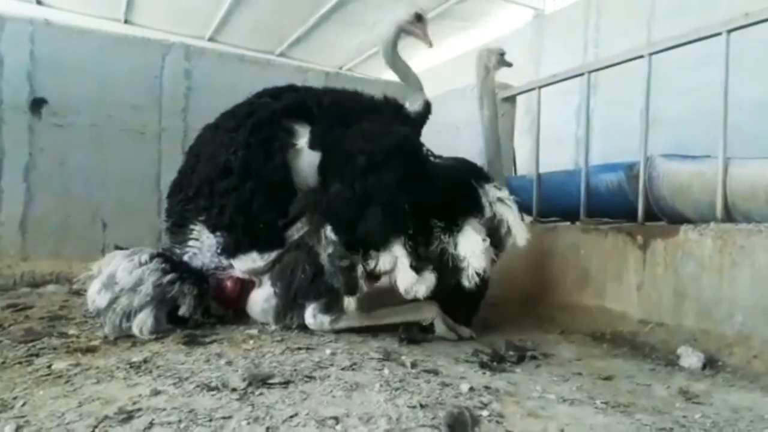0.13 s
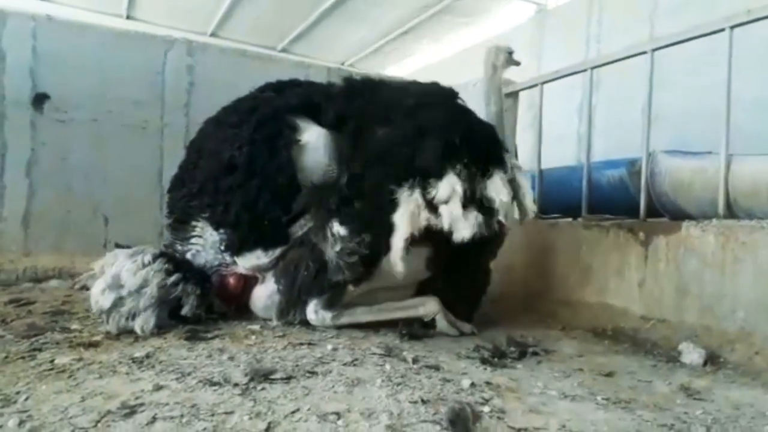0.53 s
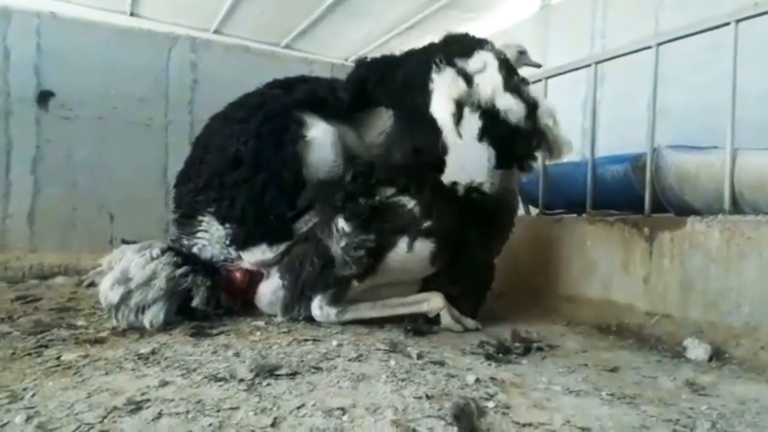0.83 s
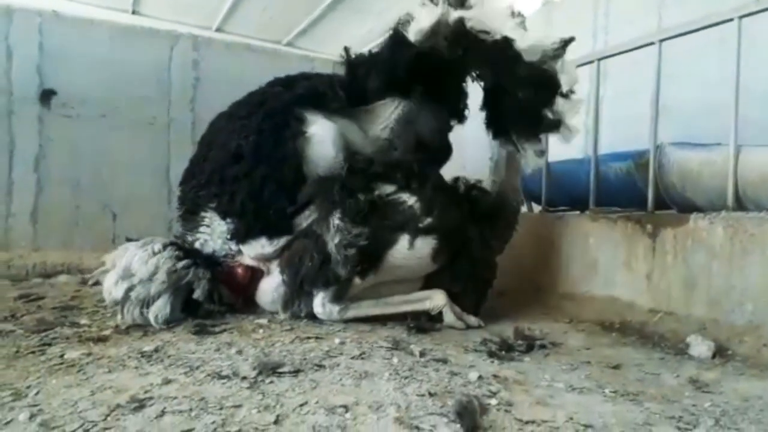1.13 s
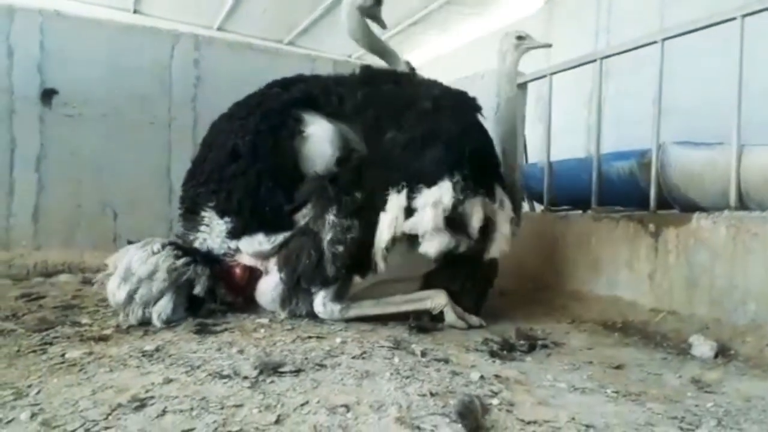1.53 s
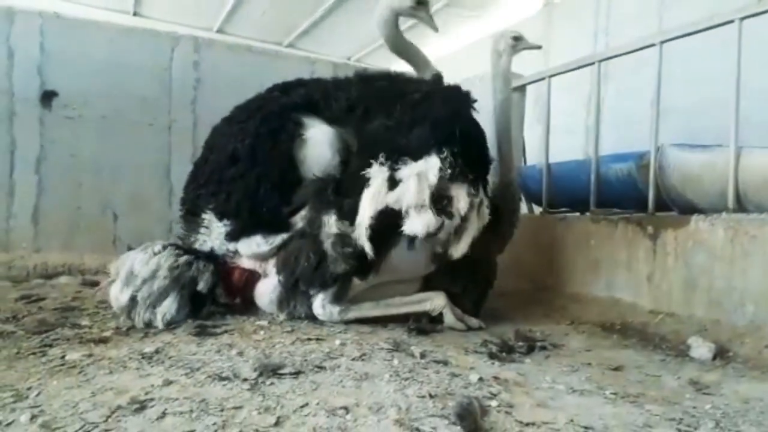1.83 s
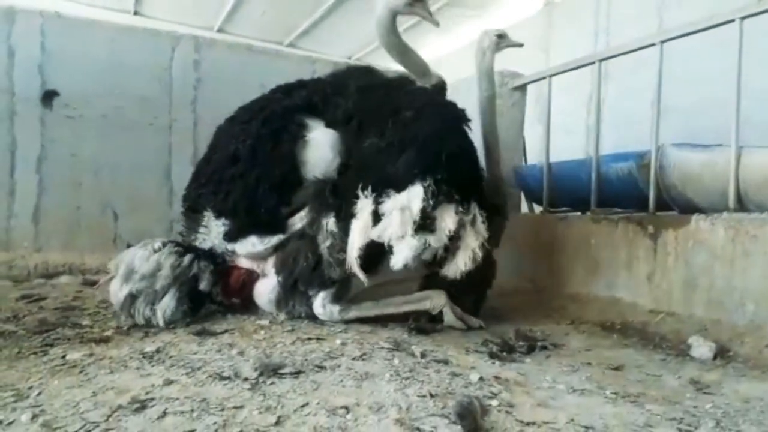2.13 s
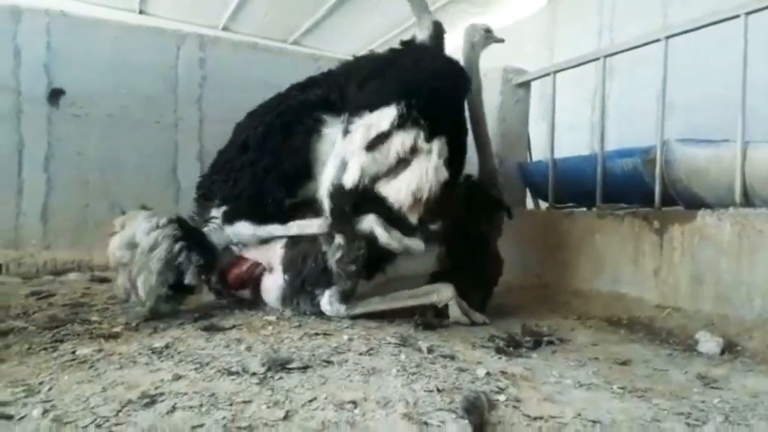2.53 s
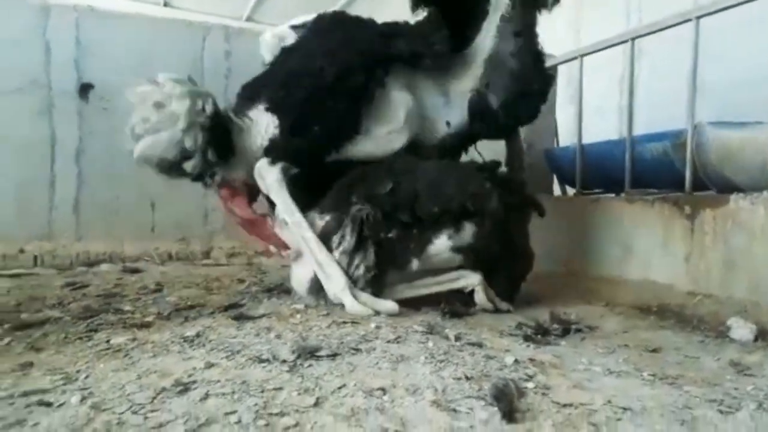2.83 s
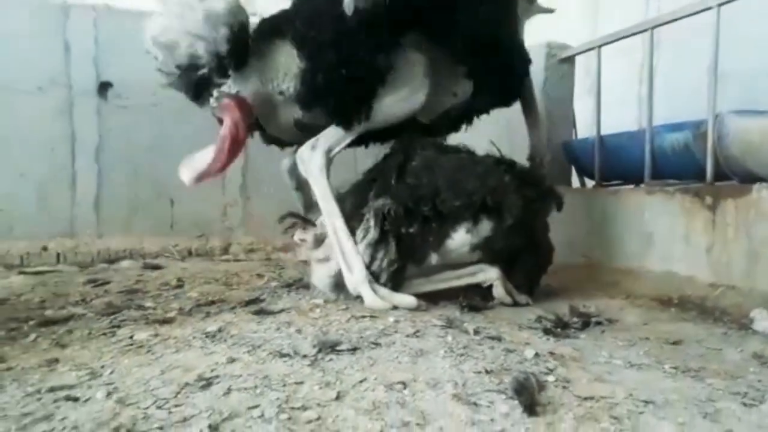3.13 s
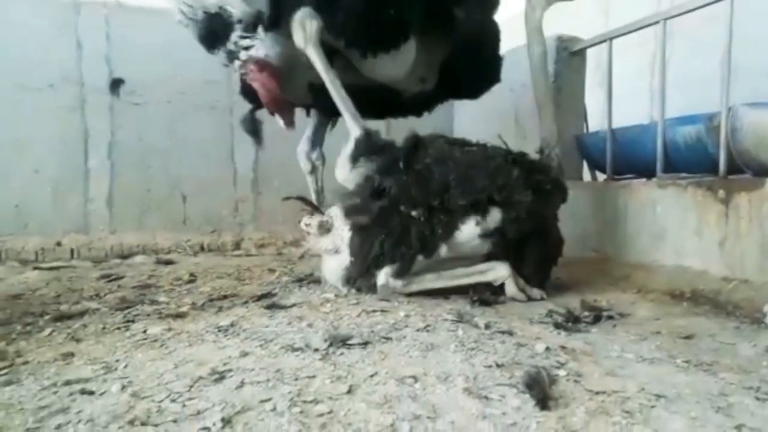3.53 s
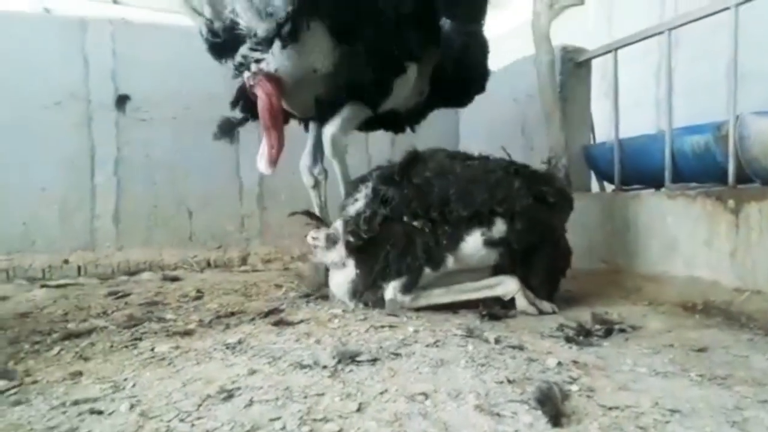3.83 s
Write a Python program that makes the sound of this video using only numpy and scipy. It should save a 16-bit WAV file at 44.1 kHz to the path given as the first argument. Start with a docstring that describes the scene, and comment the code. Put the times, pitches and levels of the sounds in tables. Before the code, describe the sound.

A male ostrich gives one short, low, breathy boom that sinks in pitch, then wings thud softly; after quiet rustling it gets up, feet scuffing dirt and claws knocking stones. Covered concrete pen, short echo, nearly mono.

```python
"""A male ostrich groans out one low boom in a covered concrete pen: partials of a falling pitch, shaped by
neck sac and throat resonances, with noise hissing through the throat. Grains of feather rustle, a quiet
background and faint chirps (narrow noise) run from early on. Its wings then beat softly as sagging low
cycles, single plumes swish as swells of grains, and it gets up: feet scuff the dirt as thump and grit,
and claws knock on stones as ringing modes. A short echo follows; the sound is nearly mono."""
import sys
import numpy as np
from scipy import signal
from scipy.fft import rfft, irfft
from scipy.io import wavfile
from scipy.ndimage import map_coordinates

SR = 44100
rng = np.random.default_rng(int(sys.argv[2]) if len(sys.argv) > 2 else 0)


def file_out(sig):
    """Save sig as 16-bit WAV at sys.argv[1]."""
    # one column per channel
    cols = np.atleast_2d(sig).T
    # limit, then scale
    lim = np.clip(cols, -1, 1)
    pcm = np.round(lim * 32767).astype(np.int16)
    wavfile.write(sys.argv[1], SR, pcm)


N = 176400

# Spectrum of the throat air before its glide, and of the buzz. Each row: frequency in Hz, level in dB.
THROAT_AIR_COLOUR = [(300, -27), (550, -0.5), (720, -7), (980, -9.5), (1290, -2.5), (1500, -9), (1800, 3.5),
                     (2000, -1), (2350, -10.5), (3650, -19.5), (4450, -14), (4900, -19), (7000, -29),
                     (12000, -48)]


def undb(db):
    """Decibels to amplitude gain."""
    return 10 ** (np.asarray(db) / 20)


def unit(x):
    """Scale to rms 1."""
    return x / np.sqrt(np.mean(x ** 2))


def curve(rows):
    """Each column after the time column, joined by straight lines in time."""
    rows = np.array(rows, float)
    return [np.interp(np.arange(N) / SR, rows[:, 0], column) for column in rows.T[1:]]


def colour(x, points):
    """Filter by a spectrum of (Hz, dB) points, joined on a log frequency axis."""
    hz, db = np.array(points, float).T
    f = np.maximum(np.fft.rfftfreq(len(x), 1 / SR), 1)
    gain = undb(np.interp(np.log(f), np.log(hz), db))
    return irfft(rfft(x) * gain, len(x))


def noise(points):
    """Coloured Gaussian noise of rms 1."""
    return unit(colour(rng.standard_normal(N), points))


def walk(rate_hz):
    """Smooth random wavering up to about rate_hz, rms 1."""
    f = np.fft.rfftfreq(N, 1 / SR)
    return unit(irfft(rfft(rng.standard_normal(N)) * np.exp(-(f / rate_hz) ** 2), N))


def since(start_s):
    """Seconds since a moment, zero before it."""
    return np.maximum(np.arange(N) / SR - start_s, 0)


def blow(age, attack_s, decay_s):
    """Envelope of a strike: a rounded rise, then an exponential fall."""
    rise = np.sin(np.pi / 2 * np.minimum(age / attack_s, 1)) ** 2
    return rise * np.exp(-np.clip((age - attack_s) / decay_s, 0, 20))


def swell(middle_s, sigma_s):
    """Gaussian envelope with peak 1."""
    t = np.arange(N) / SR
    return np.exp(-np.minimum(((t - middle_s) / sigma_s) ** 2 / 2, 20))


def grains(points):
    """Dense tiny clicks of scattered size and random sign, coloured, rms 1."""
    grains_per_s, scatter_db = 4000, 2
    size = undb(scatter_db * np.minimum(rng.exponential(size=N), 2 * np.e))
    hits = rng.random(N) < grains_per_s / SR
    return unit(colour(hits * size * rng.choice([-1, 1], N), points))


def waver(x, depth_db, count=18):
    """Overlapping log-spaced bands from 300 Hz to 8 kHz, end bands open, each waver in level; rms 1."""
    rate_hz = 24
    f = np.fft.rfftfreq(N, 1 / SR)
    place = np.interp(np.log1p(f), np.log([300, 8000]), [0, count - 1])
    spectrum = rfft(x)
    out = 0
    for k in range(count):
        band = irfft(spectrum * np.maximum(1 - abs(place - k), 0), N)
        out = out + band * undb(depth_db * walk(rate_hz))
    return unit(out)


def buzz(phase, count=36):
    """Partials of the groan at random phases, coloured like the throat air, rms 1."""
    offsets = rng.random(count) * 2 * np.pi
    partials = sum(np.sin((k + 1) * phase + offsets[k]) for k in range(count))
    return unit(colour(partials, THROAT_AIR_COLOUR))


def sink(x, per_s):
    """Play a sound ever more slowly, so that its resonances glide down."""
    return map_coordinates(x, [SR * np.log1p(per_s * since(0)) / per_s], mode="mirror")


def resonance(hz, centre_hz, half_width_hz):
    """Gain of a rounded resonance: 1 at the centre, 1/2 at half_width_hz from it."""
    return 1 / (1 + ((hz - centre_hz) / half_width_hz) ** 4)


def groan(phase, pitch_hz, sac, throat, count=10):
    """Fluttering harmonics, weighted by the neck sac and throat resonances over a weak overtone floor."""
    sac_half_width_hz, throat_half_width_hz, overtone_db = 54.2, 26.5, -26
    flutter, flutter_hz = 0.18, 17
    (sac_hz, sac_db), (throat_hz, throat_db) = sac, throat
    out = 0
    for k in range(1, count + 1):
        gain = undb(sac_db) * resonance(k * pitch_hz, sac_hz, sac_half_width_hz)
        gain = gain + undb(throat_db) * resonance(k * pitch_hz, throat_hz, throat_half_width_hz)
        gain = gain + undb(sac_db + overtone_db) * min(1, (count / 2 / k) ** 2)
        in_phase = (1 + flutter * walk(flutter_hz)) * np.sin(k * phase)
        quadrature = flutter * walk(flutter_hz) * np.cos(k * phase)
        out = out + np.sqrt(2) * gain * (in_phase + quadrature)
    return out


def throat_air(phase):
    """Hiss pulsing once a cycle plus buzz; the hiss sinks in pitch as the bird runs out of air."""
    # Each row: time in seconds, level in dB.
    air_level = [(0, -49.5), (.05, -47.5), (.09, -44), (.125, -49.5), (.18, -51.5), (.245, -55),
                 (.31, -51.5), (.37, -54.5), (.42, -62), (.52, -59), (.6, -82)]
    pulsing, sag_per_s, buzz_db, waver_db = 0.32, 0.22, -1, 1.9
    hiss = sink(noise(THROAT_AIR_COLOUR), sag_per_s) * (1 + pulsing * np.cos(phase))
    return undb(curve(air_level)[0]) * waver(hiss + undb(buzz_db) * buzz(phase), waver_db)


def boom():
    """A low, slightly gruff tone with jittered pitch and throat air, faded out at its end."""
    # Each row: time in seconds, pitch in Hz, neck sac resonance in Hz, its level in dB,
    # throat resonance in Hz, its level in dB.
    track = [(0, 66.6, 136.7, -36, 325, -34), (.04, 68.66, 135, -34.5, 340, -33.5),
             (.08, 70.28, 140, -33, 359, -38.5), (.145, 68.73, 145, -40, 327, -36),
             (.2, 65.88, 171, -40, 296, -45), (.245, 64.3, 181, -38, 287, -44),
             (.28, 64.85, 182, -37.5, 293, -37), (.365, 61.87, 178, -37, 290.3, -37),
             (.445, 59.9, 153, -41, 296, -51), (.54, 59.1, 134, -48, 321.4, -67),
             (.62, 55.64, 121.9, -62, 327, -67)]
    # Each row: frequency in Hz, level in dB.
    gruff_colour = [(30, -30), (70, -7), (200, -1), (370, -1.5), (420, -15.5), (900, -42), (3000, -69)]
    jitter, jitter_hz, gruff_db = 0.01128, 29.1, -9.5
    end_s, release_s = 0.611, 0.068
    pitch_hz, sac_hz, sac_db, throat_hz, throat_db = curve(track)
    phase = 2 * np.pi * np.cumsum(pitch_hz * (1 + jitter * walk(jitter_hz))) / SR
    tone = groan(phase, pitch_hz, (sac_hz, sac_db), (throat_hz, throat_db))
    gruff = undb(sac_db + gruff_db) * noise(gruff_colour)
    release = np.exp(-np.minimum(since(end_s) / release_s, 20))
    return (tone + gruff + throat_air(phase)) * release


def feathers():
    """Plumes brush each other in uneven rustling grains as the bird shifts and rises."""
    # Each row: time in seconds, level in dB.
    rustle_level = [(.5, -63), (1.05, -67.5), (1.45, -71.5), (1.57, -65), (2.13, -66), (2.38, -64.5),
                    (2.6, -59.5), (2.71, -54.5), (2.82, -55.5), (2.93, -53.5), (2.99, -62.5), (3.1, -58),
                    (3.17, -67), (3.215, -57.5), (3.3, -66), (3.43, -66.5), (3.46, -58.5), (3.55, -55.5),
                    (3.63, -67.5), (3.81, -71.5), (3.87, -57.5), (3.94, -57.5), (4, -60)]
    # Each row: frequency in Hz, level in dB.
    rustle_colour = [(80, -1.5), (280, -9), (480, 2.5), (900, -2), (1400, 0), (2100, 2.5), (3000, -5.5),
                     (4300, -5), (5200, -12), (6500, -21.5), (9000, -29), (13000, -51)]
    flicker_db, flicker_hz, waver_db = 1, 27, 3
    level_db = curve(rustle_level)[0] + flicker_db * walk(flicker_hz)
    return undb(level_db) * waver(grains(rustle_colour), waver_db)


def pen_background():
    """Quiet coloured noise whose bands waver in level."""
    # Each row: frequency in Hz, level in dB.
    pen_colour = [(30, -19), (60, -5.5), (130, 0), (310, -3), (440, -13.5), (950, -16), (1300, -12.5),
                  (2100, -15.5), (3000, -20), (4300, -23), (8500, -44.5), (13000, -34.5)]
    level_db, waver_db = -65, 2.5
    return undb(level_db) * waver(noise(pen_colour), waver_db)


def side_hiss():
    """Faint steady hiss, independent on the two sides."""
    # Each row: frequency in Hz, level in dB.
    hiss_colour = [(200, -9.5), (2000, -18), (4200, -5.5), (6000, 6.5), (9000, -0.5), (13000, -1)]
    level_db = -78.5
    return undb(level_db) * np.array([noise(hiss_colour), noise(hiss_colour)])


def chirps():
    """Brief, hoarse peeps and squeaks: random wavering on a carrier makes narrow noise."""
    # Each row: middle in seconds, frequency in Hz, level in dB, Gaussian sigma in seconds.
    peeps = [(0.372, 3324, -58.5, 0.0091), (0.694, 3265, -47.5, 0.0035), (0.704, 3250, -60.5, 0.01),
             (2.886, 2200, -48, 0.0041), (2.935, 2102, -53.5, 0.013), (3.675, 1990, -60, 0.01),
             (3.717, 1864, -67, 0.011)]
    waver_hz = 230
    t = np.arange(N) / SR
    a, b = walk(waver_hz), walk(waver_hz)
    out = 0
    for middle_s, hz, db, sigma_s in peeps:
        carrier = a * np.sin(2 * np.pi * hz * t) + b * np.cos(2 * np.pi * hz * t)
        out = out + undb(db) * swell(middle_s, sigma_s) * carrier
    return out


def wings():
    """Each soft thud is a cycle or two of sagging low pressure with a little fluff, low-passed."""
    # Each row: start in seconds, nominal peak in dB, starting frequency in Hz, decay in seconds.
    thuds = [(0.7, -42, 102, 0.0071), (0.819, -34, 101, .009), (0.845, -38.5, 87, 0.0052),
             (0.905, -40, 71.7, 0.0097), (0.925, -37.5, 80.5, 0.012), (0.96, -36, 89, 0.0075),
             (1.005, -46, 75, 0.015), (1.114, -23.5, 114, 0.011), (1.154, -32, 99, 0.012),
             (1.184, -42.5, 140, 0.0094), (1.232, -39, 105, 0.016), (1.297, -39.5, 216, 0.0069),
             (1.305, -43, 80.6, 0.0093), (1.345, -40, 87, 0.013), (1.484, -39.5, 106, 0.0058),
             (1.572, -40.5, 117, 0.0063), (3.393, -51, 89, 0.005), (3.441, -50.5, 98, 0.0036),
             (3.928, -45, 188, 0.0033)]
    # Each row: frequency in Hz, level in dB.
    fluff_colour = [(40, -6), (120, 2), (320, -6), (420, -12.5), (600, -10), (1200, -25), (4000, -70)]
    attack_s, sag_per_s, fluff_db, top_hz = 0.0052, 5.1, -18.5, 410
    fluff = undb(fluff_db) * noise(fluff_colour)
    out = 0
    for start_s, db, hz, decay_s in thuds:
        age = since(start_s)
        turns = hz * np.log1p(sag_per_s * age) / sag_per_s
        pressure = -np.cos(2 * np.pi * turns) * blow(age, attack_s, decay_s)
        out = out + undb(db) * (pressure + fluff * blow(age, attack_s, 2 * decay_s))
    return signal.sosfilt(signal.butter(2, top_hz, fs=SR, output="sos"), out)


def swishes():
    """Single plumes slide past each other: a soft swell of grains in one broad band."""
    # Each row: middle in seconds, centre in Hz, level in dB, Gaussian sigma in seconds.
    slides = [(1.149, 2230, -57, .012), (1.348, 3450, -65.5, 0.013), (1.756, 2360, -71, .03),
              (2.017, 2200, -63, 0.026), (2.266, 4350, -67.5, 0.03), (2.702, 4070, -59, 0.06)]
    edge_ratio = 2.9  # the band is 40 dB down at this ratio from its centre
    out = 0
    for middle_s, hz, db, sigma_s in slides:
        band = grains([(hz / edge_ratio, -40), (hz, 0), (hz * edge_ratio, -40)])
        out = out + undb(db) * band * swell(middle_s, sigma_s)
    return out


def feet():
    """Each scuff on dirt is a dull noise thump with crunching grit grains."""
    # Each row: start in seconds, thump level in dB, decay in seconds, grit relative to the thump in dB.
    scuffs = [(1.87, -54.5, 0.049, -32), (1.938, -62.5, 0.09, -8), (1.981, -63, 0.013, 7.5),
              (2.154, -50, .008, -14), (2.178, -51.5, 0.018, -14), (2.446, -48.5, .02, -23),
              (2.709, -45, 0.023, -3.5), (2.774, -39.5, 0.01, -14), (2.789, -38.5, 0.011, -7),
              (2.821, -58, 0.6, -22), (2.853, -53, .006, -7), (2.998, -50.5, 0.013, -3.5),
              (3.191, -59, 0.023, 8), (3.229, -64.5, 0.029, -12), (3.888, -51.5, 0.025, -2),
              (3.929, -48, 0.026, -12), (3.965, -50, 0.011, -8)]
    # Two spectra. Each row: frequency in Hz, level in dB.
    thump_colour = [(40, -13), (100, -2), (220, -1.5), (330, -3), (450, -15.5), (800, -13), (2000, -40),
                    (8000, -64)]
    grit_colour = [(150, -34), (380, 3.5), (700, 3.5), (1200, 4.5), (2000, -9.5), (3000, -10), (4300, -16),
                   (7000, -27), (12000, -51)]
    attack_s = 0.00088
    thump, grit = noise(thump_colour), grains(grit_colour)
    out = 0
    for start_s, db, decay_s, grit_db in scuffs:
        texture = thump + undb(grit_db) * grit
        out = out + undb(db) * blow(since(start_s), attack_s, decay_s) * texture
    return out


def claws():
    """Claws knock on stones: short noise cracks and a few quickly damped modes."""
    # Each row: start in seconds, low modes' gain in dB, high modes' gain in dB, crack level in dB.
    knocks = [(2.8687, -50, -33.5, -70), (2.9101, -26.5, -31.5, -70), (3.028, -41.5, -45, -48),
              (3.033, -35.5, -49, -54.5), (3.047, -59, -52, -56), (3.283, -44.5, -58, -78.5)]
    # Each row: mode frequency in Hz, relative level in dB, T60 in seconds.
    modes = [(730, -6.5, 0.026), (1146, -1.5, 0.03), (1610, -5.5, 0.01), (3530, -8, 0.013),
             (3830, -4, 0.01), (3976, -13, 0.035)]
    # Each row: frequency in Hz, level in dB.
    crack_colour = [(300, -10), (1500, -3), (4000, 11.5), (7000, 0.5), (9000, -21.5), (13000, -16)]
    split_hz, attack_s, crack_decay_s = 1450, 0.00075, 0.0075
    crack = noise(crack_colour)
    out = 0
    for start_s, low_db, high_db, crack_db in knocks:
        age = since(start_s)
        out = out + undb(crack_db) * crack * blow(age, attack_s, crack_decay_s)
        for hz, db, t60_s in modes:
            strength = undb(db + (low_db if hz < split_hz else high_db))
            ring = np.sin(2 * np.pi * hz * age) * blow(age, attack_s, t60_s / np.log(1000))
            out = out + strength * ring
    return out


def room(x):
    """The pen's short diffuse echo: convolution with a decaying noise tail of unit energy."""
    # Each row: frequency in Hz, level in dB.
    room_colour = [(50, -5.5), (200, 0.5), (900, -5.5), (2100, 1.5), (4000, -6), (10000, -2.5)]
    t60_s, delay_s = 0.28, 0.012
    age = since(delay_s)
    tail = noise(room_colour) * (age > 0) * np.exp(-np.log(1000) * age / t60_s)
    return signal.fftconvolve(x, tail / np.sqrt(np.sum(tail ** 2)))[:N]


def scene():
    """Nearly mono; a little decorrelated treble noise, following the rustle's level, and a hiss widen it."""
    # Spectrum of the side signal. Each row: frequency in Hz, level in dB.
    spread_colour = [(2700, -45), (4200, -4), (6000, 9)]
    boom_wet_db, thud_wet_db, foot_wet_db, spread_db = -11, -11.5, -10.5, -13.5
    voice, thuds = boom(), wings()
    sharp = feet() + claws() + chirps()
    echo = room(undb(boom_wet_db) * voice + undb(thud_wet_db) * thuds + undb(foot_wet_db) * sharp)
    mono = voice + thuds + sharp + echo + feathers() + swishes() + pen_background()
    # separately drawn treble noise, opposite in sign on the two sides
    side = undb(spread_db) * colour(feathers() + swishes(), spread_colour)
    return np.array([mono + side, mono - side]) + side_hiss()


def record(dry):
    """The recorder drops the deepest bass and cuts the top."""
    bass_hz, top_hz = 35, 13100
    thin = signal.sosfilt(signal.butter(2, bass_hz, "high", fs=SR, output="sos"), dry)
    # 0.2 dB ripple, 70 dB stopband
    return signal.sosfilt(signal.ellip(10, 0.2, 70, top_hz, fs=SR, output="sos"), thin)


dry = scene()
out = record(dry)
file_out(out)
```